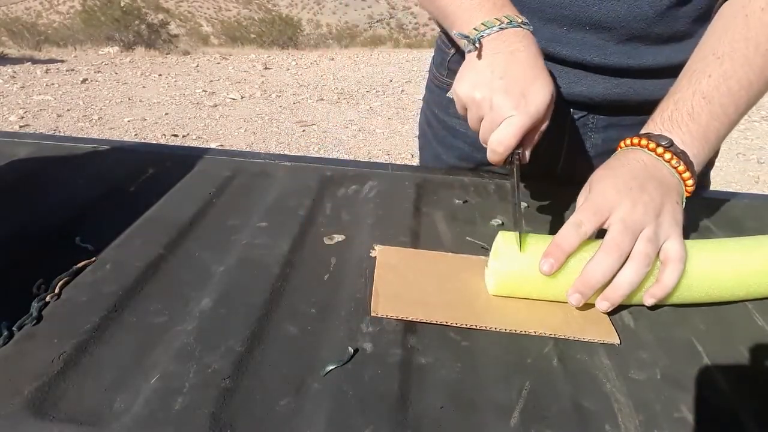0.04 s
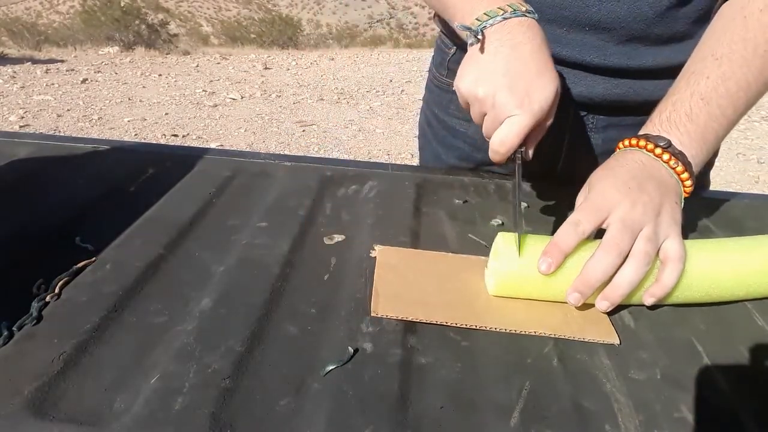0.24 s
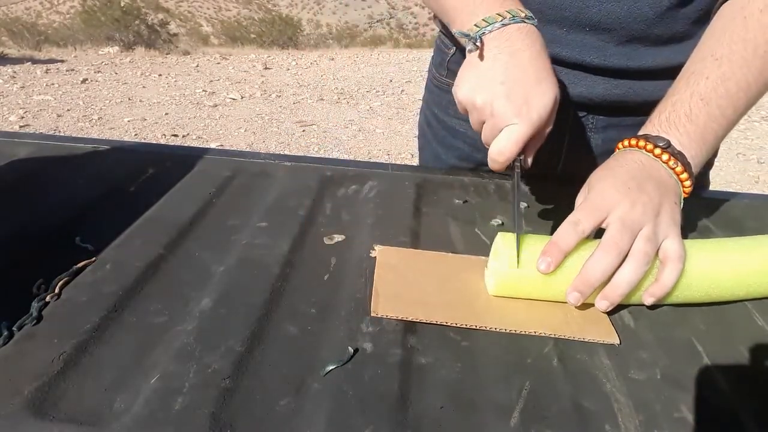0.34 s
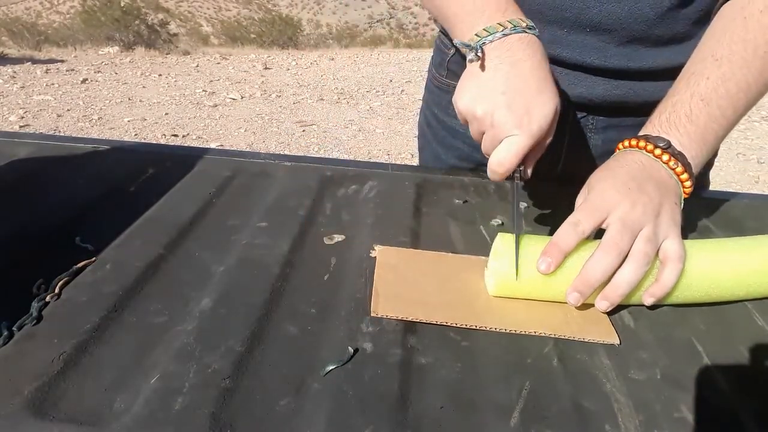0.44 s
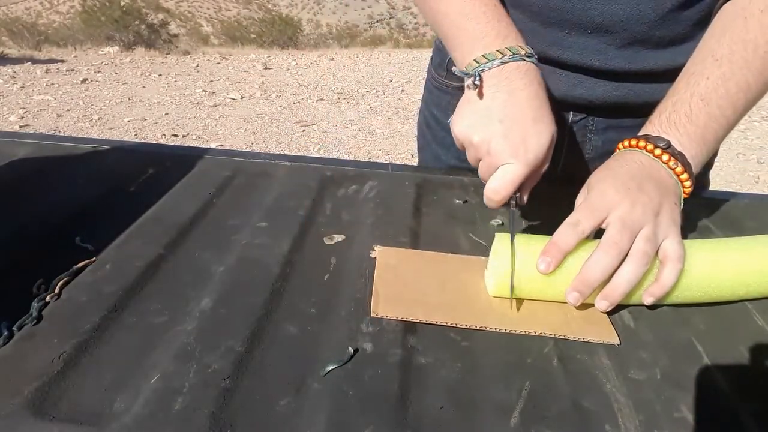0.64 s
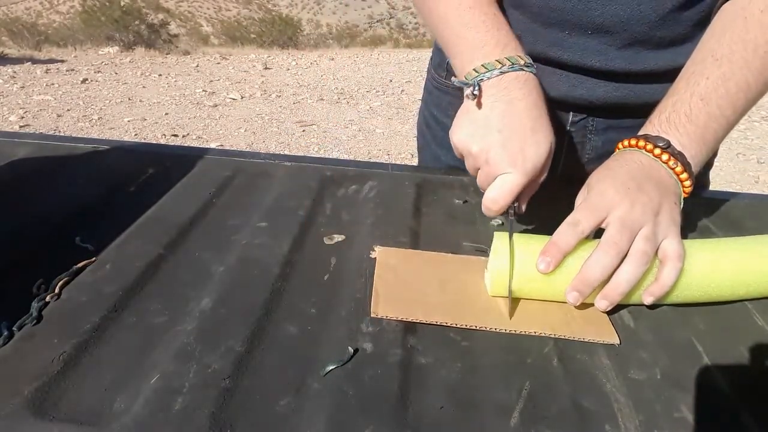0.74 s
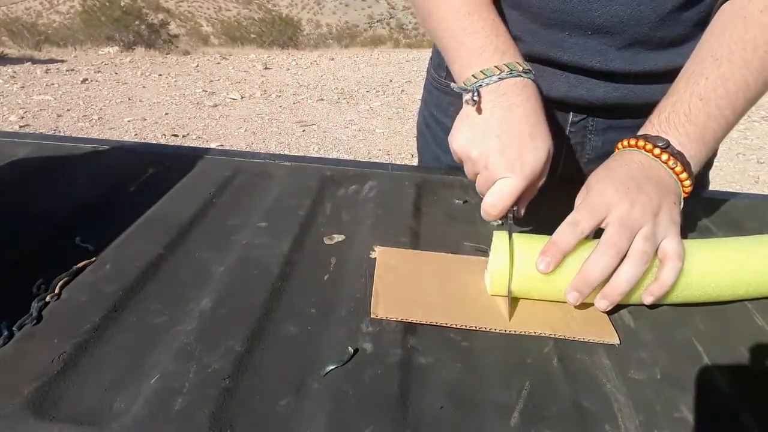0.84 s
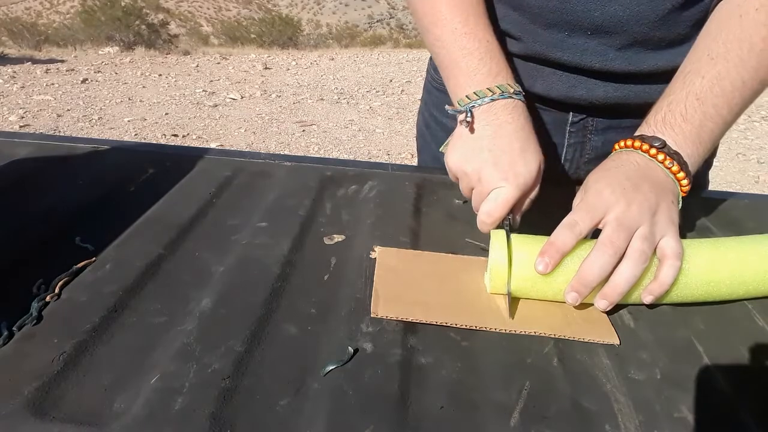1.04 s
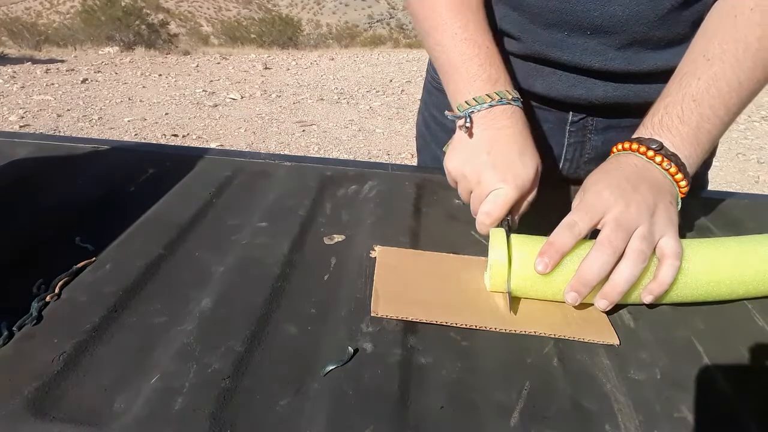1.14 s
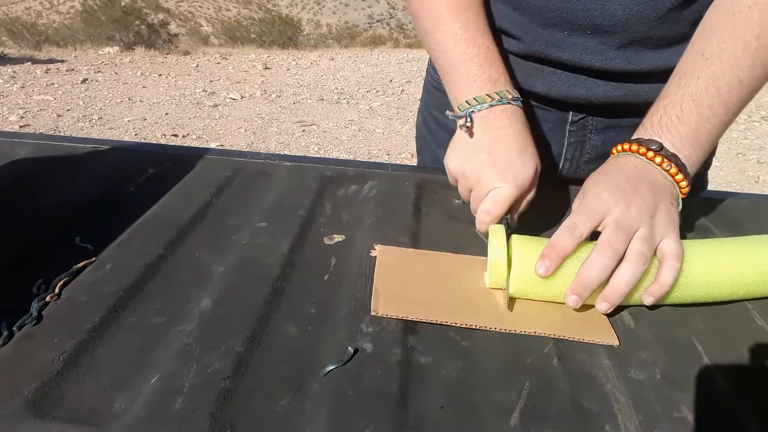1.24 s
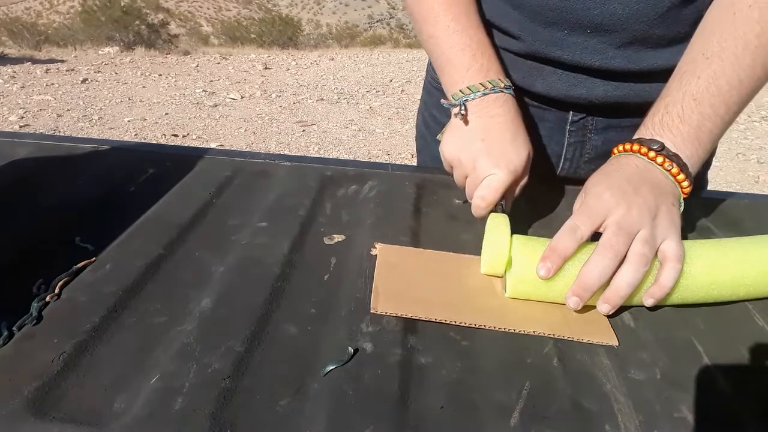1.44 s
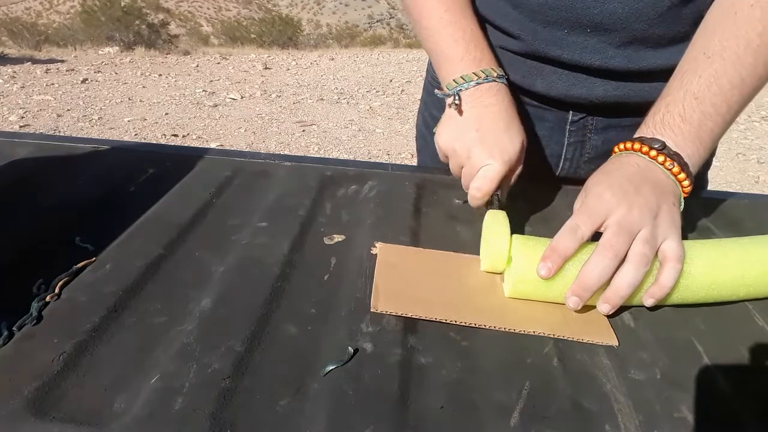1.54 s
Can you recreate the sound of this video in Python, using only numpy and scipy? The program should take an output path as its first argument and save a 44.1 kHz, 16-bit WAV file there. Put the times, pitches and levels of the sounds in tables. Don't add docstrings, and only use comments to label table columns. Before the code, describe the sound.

Foam being cut by a blade: crisp tearing rasps, a fading lull, then one last short stroke

```python
import sys
import numpy as np
from scipy import signal
from scipy.fft import rfft, irfft
from scipy.io import wavfile
from scipy.ndimage import uniform_filter1d

SR = 44100
rng = np.random.default_rng(int(sys.argv[2]) if len(sys.argv) > 2 else 0)


def output_pcm(signal):
    pcm = np.clip(np.atleast_2d(signal).T, -1, 1) * 32767
    wavfile.write(sys.argv[1], SR, np.round(pcm).astype(np.int16))


def invert_db(level):
    return 10 ** (np.asarray(level, dtype=float) / 20)


N = 70560


def rms_one(x):
    return x / np.sqrt(np.mean(x ** 2) + 1e-20)


def in_time(rows):
    time_s, *columns = np.transpose(rows)
    return [np.interp(np.arange(N) / SR, time_s, column) for column in columns]


def at_hz(points, hz):
    point_hz, point_db = np.transpose(points)
    return np.interp(np.log(hz), np.log(point_hz), point_db)


def drift(rate_hz):
    r = np.exp(-2 * np.pi * rate_hz / SR)
    wander = signal.lfilter([1], [1, -2 * r, r * r], rng.standard_normal(N + SR))
    return rms_one(wander[SR:])


def fade(x, decay_s):
    return signal.lfilter([1], [1, -np.exp(-1 / (decay_s * SR))], x + 1e-18)


def resonate(x, hz, width_hz):
    r = np.exp(-np.pi * width_hz / SR)
    zeros = (1 - r * r) / 2 * np.array([1, 0, -1])
    return signal.lfilter(zeros, [1, -2 * r * np.cos(2 * np.pi * hz / SR), r * r], x)


def highpass(x, cutoff_hz):
    return signal.sosfilt(signal.butter(4, cutoff_hz, "high", fs=SR, output="sos"), x)


def coloured(spectrum):
    hz = np.maximum(np.arange(N // 2 + 1) * SR / N, 1)
    return rms_one(irfft(rfft(rng.standard_normal((2, N))) * invert_db(at_hz(spectrum, hz)), N))


def ports(mid, side):
    return np.array([mid + side, mid - side])


def narrow(side):
    return signal.sosfilt(signal.ellip(8, 1, 60, 7500, fs=SR, output="sos"), side)


# freq_hz, density_db_per_hz
HUSH_SPECTRUM = [(240, -17), (410, -16), (598, -21.5), (2510, -26), (5430, -32), (15000, -24), (16000, -68)]


def hush():
    mid, side = coloured([(100, -61)] + list(HUSH_SPECTRUM))
    return invert_db(-77) * ports(mid, narrow(side))


# freq_hz, density_db_per_hz
WIND_SPECTRUM = [(20, -22), (50, -16), (85, -1), (105, -3), (135, -3), (200, -10), (400, -21), (800, -51.5)]
# time_s, level_db, left_minus_right_db
GUSTS = [(0, -60, 0), (.09, -69.5, 11), (.125, -50, 5), (.2, -58, 2.5), (.3, -49.5, -10.5),
         (.37, -57.5, 0.5), (.6, -58, -10.5), (.72, -50, 1.5), (.83, -65, -4), (.9, -43.5, -2),
         (.965, -41, -0.5), (1.03, -46, -9.5), (1.05, -37, 4), (1.07, -47, -2), (1.17, -52, 4),
         (1.4, -53.5, -2), (1.56, -59.5, -2.5), (1.59, -47, -6.5)]


def wind():
    LUMPY_DB, ALIKE, BRIGHTENS_DB_PER_DB = 4, 0.092, 0.84
    level_db, pan_db = in_time(GUSTS)
    a, b = coloured([(8, -66)] + list(WIND_SPECTRUM) + [(1500, -100)])
    lumps = invert_db(LUMPY_DB * np.array([drift(30), drift(25)]))
    pair = rms_one(lumps * ports(np.sqrt(1 + ALIKE) * a, np.sqrt(1 - ALIKE) * b))

    power = uniform_filter1d(pair ** 2, size=SR // 25)
    pair = pair / np.sqrt(uniform_filter1d(power, size=SR // 25))

    dull = signal.sosfiltfilt(signal.butter(2, 170, fs=SR, output="sos"), pair)
    pair = dull + (pair - dull) * invert_db(BRIGHTENS_DB_PER_DB * (level_db + 43.5))
    return invert_db(level_db + np.array([pan_db, -pan_db]) / 2) * pair


# time_s, level_db
SLIDE_LEVEL = [
    (1.335, -59),
    (1.37, -57.5),
    (1.48, -60),
    (1.53, -64.5),
    (1.6, -67),
]
# freq_hz, width_hz, level_db
SLIDE_BANDS = [(1220, 660, -1), (2500, 1270, -3.5), (4500, 1500, -4), (7630, 1550, -6.5),
               (10560, 1700, -7.5), (14000, 3300, -9)]


def slide():
    level_db, = in_time([(0, -130), (SLIDE_LEVEL[0][0] - .02, -90)] + list(SLIDE_LEVEL))
    friction = rng.standard_normal((2, N))
    rubbed = np.zeros((2, N))
    for k, (hz, width_hz, band_db) in enumerate(SLIDE_BANDS):
        rubbed += (-1) ** k * invert_db(band_db + drift(6.7)) * resonate(friction, hz, width_hz)
    mid, side = rms_one(rubbed)
    return invert_db(level_db) * ports(mid, invert_db(-4.5) * narrow(side))


# freq_hz, side_minus_mid_db
PORT_DIFFERENCE = [(300, -9), (1000, -15), (2000, -14), (4000, -3), (8000, -6), (14000, -6.5)]


def side_gain(hz):
    return invert_db(at_hz(PORT_DIFFERENCE, hz))


def cracks(time_s, peak_db, pitch_hz):
    CRACK_DB, CYCLES, LEAST_S = -5, .5, .00007
    steps = np.arange(SR // 200)
    t, hz = steps / SR, pitch_hz[:, None]
    age = t / np.maximum(CYCLES / hz, LEAST_S)
    pulse = np.sin(2 * np.pi * hz * t) * age * np.exp(1 - age)
    index = (time_s * SR).astype(int)[:, None] + steps - 8
    out = np.zeros((2, N))
    for row, gain in zip(out, [1, side_gain(pitch_hz)]):
        size = gain * invert_db(peak_db + CRACK_DB) * rng.choice([-1, 1], len(time_s))
        np.add.at(row, index, size[:, None] * pulse)
    return highpass(out + 1e-18, 1050)


# time_s, peak_db, pitch_hz (favoured region)
FIRST_TEARS = [(0.2343, -39, 2080), (0.2391, -29, 1890), (0.2442, -18, 1890), (0.2539, -20, 1890),
               (0.26, -26, 1890), (0.2656, -27, 2080), (0.2773, -25, 1290), (0.2934, -31, 1170),
               (0.3011, -24, 1560), (0.3033, -28, 1890), (0.3098, -26, 1890), (0.3151, -28, 1560),
               (0.3172, -24, 1420), (0.3308, -30, 2080), (0.3369, -33, 1170), (0.3561, -31, 1560),
               (0.3585, -27, 1720), (0.3643, -28, 1890), (0.3697, -26, 2080), (0.3747, -26, 2280),
               (0.3832, -29, 2080), (0.3886, -27, 2280), (0.3959, -29, 1170), (0.3989, -27, 2080),
               (0.4021, -28, 2280), (0.4071, -30, 2770), (0.4106, -29, 1890), (0.4187, -30, 2080),
               (0.4278, -32, 1890), (0.4392, -31, 1290), (0.4464, -26, 2080), (0.4499, -31, 2280),
               (0.4582, -25, 1890), (0.4713, -27, 2280)]
DEEP_TEARS = [(0.4802, -26, 1890), (0.4861, -22, 1290), (0.4949, -26, 1890), (0.4994, -26, 1290),
              (0.5088, -30, 1290), (0.5159, -22, 3350), (0.5241, -26, 1290), (0.5275, -26, 1560),
              (0.5315, -22, 3350), (0.5351, -18, 1420), (0.5463, -21, 6530), (0.5519, -29, 1420),
              (0.5557, -31, 1890), (0.5641, -29, 1890), (0.5668, -21, 12730), (0.5739, -28, 3350),
              (0.5814, -21, 3350), (0.59, -21, 3040), (0.6006, -24, 1290), (0.6053, -22, 1890),
              (0.6098, -21, 3350), (0.6149, -20, 2770), (0.6227, -24, 3350), (0.6319, -23, 1560),
              (0.6393, -17, 3350), (0.6429, -26, 1560), (0.6536, -13, 3040), (0.6649, -25, 1720),
              (0.6716, -20, 1890), (0.6749, -24, 1560), (0.683, -18, 3040), (0.6868, -24, 3040),
              (0.692, -27, 7180), (0.6948, -25, 3350), (0.6977, -24, 3040), (0.703, -31, 3350)]
SLOW_TEARS = [(0.7101, -21, 3040), (0.7191, -25, 3350), (0.7271, -24, 3040), (0.7351, -21, 3350),
              (0.7466, -21, 2770), (0.757, -34, 12730), (0.7595, -30, 9560), (0.7641, -35, 2770),
              (0.7744, -30, 11570), (0.7816, -29, 14000), (0.7918, -34, 7900), (0.7953, -44, 2280),
              (0.7997, -37, 6530), (0.8083, -49, 7900), (0.8204, -33, 7180), (0.8305, -39, 10520),
              (0.8341, -36, 3350), (0.8419, -31, 3350), (0.8574, -32, 2080), (0.8732, -38, 14000),
              (0.8757, -38, 1720), (0.8811, -37, 7900), (0.8892, -36, 12730), (0.9063, -37, 1560),
              (0.9224, -31, 14000), (0.9282, -34, 2080), (0.9368, -39, 1420), (0.9536, -29, 2080),
              (0.9616, -41, 14000), (0.9688, -39, 2510), (0.9798, -29, 1720), (0.9846, -42, 7180),
              (1.0047, -35, 14000), (1.0148, -37, 3040), (1.0224, -45, 2770), (1.0336, -49, 12730)]
LAST_TEARS = [(1.1212, -51, 7180), (1.1273, -47, 1720), (1.1298, -37, 3040), (1.1347, -41, 3040),
              (1.1392, -39, 1560), (1.1451, -47, 3040), (1.1498, -36, 1720), (1.1534, -32, 12730),
              (1.1658, -29, 1560), (1.1714, -28, 1720), (1.1786, -30, 1720), (1.1866, -29, 1560),
              (1.1928, -24, 1560), (1.199, -19, 2770), (1.2044, -22, 3350), (1.2114, -18, 1720),
              (1.2279, -26, 1720), (1.2304, -30, 1560), (1.2349, -27, 1890), (1.2406, -30, 3680),
              (1.2475, -27, 1890), (1.2566, -20, 1720), (1.2603, -23, 1560), (1.264, -34, 11570),
              (1.271, -28, 12730), (1.2831, -31, 1720), (1.2884, -31, 1890), (1.2919, -31, 1420),
              (1.295, -41, 1720), (1.2999, -40, 1420), (1.3067, -21, 1720), (1.3112, -31, 1890),
              (1.3152, -25, 3350), (1.3178, -21, 1890), (1.3223, -30, 1890), (1.3274, -28, 1890),
              (1.3319, -40, 1890), (1.3366, -43, 1720)]
DOUBLE_TEARS = [
    (0.2995, -21, 11000),
    (0.682, -17, 9000),
    (0.9816, -29, 4000),
]


def large_tears():
    tables = (FIRST_TEARS, DEEP_TEARS, SLOW_TEARS, LAST_TEARS, DOUBLE_TEARS)
    return np.transpose([row for table in tables for row in table])


# time_s, level_db, tilt_db_per_octave, card_coupling_db
STROKES = [
    [(.232, -42, -2, 10), (.241, -38.5, 1, 12), (.32, -37.5, 0.5, 11.5), (.345, -39.5, 0.5, 10.5),
     (.37, -40.5, 1.5, 9), (.44, -39.5, 1.5, 12.5), (.48, -35, 1.5, 11), (.615, -32.5, 1, 7),
     (.685, -31.5, 2, 3)],
    [(.7, -36.5, 1, 1), (.74, -38.5, 1.5, 1), (.79, -49, 3, 3.5), (.815, -58.5, 3, -2), (.88, -46.5, 2, -4),
     (.94, -52.5, 1.5, -8), (.965, -51.5, 3.5, -11), (1.02, -57.5, 1.5, -9), (1.07, -72, 4.5, -12)],
    [(1.11, -66, 1, 3), (1.15, -49, 4, 0), (1.19, -35.5, 0, -14), (1.205, -31.5, 2.5, 5),
     (1.24, -35, 0, -2), (1.3, -54, 3.5, 10.5), (1.316, -38, 2, 11), (1.335, -51, -3, -17)],
]


def stroke_curves():
    before = [(0, -120, -6, -1), (STROKES[0][0][0] - .004, -90, 0, 0)]
    after = [(STROKES[-1][-1][0] + .06, -100, 0, 0)]
    return in_time(before + [row for stroke in STROKES for row in stroke] + after)


# freq_hz, width_hz, level_db
BODY = [(325, 127, -4.5), (500, 504, -1.5), (855, 144, -3), (1115, 157, -3.5), (1275, 166, 1),
        (1810, 94, 6.5), (2370, 520, -3), (3317, 307, 0), (4350, 2170, -10), (7670, 1870, -7.5),
        (8990, 2900, -12), (14030, 4800, -7.5), (15040, 4400, -12.5)]


def knife():
    SMALL_PER_S, SMALL_DB, SMALL_SPREAD_DB = 500, -7, 2.0
    TEAR_DB, SNAP_DB, COLOUR_DB, GRIT_DB = -7.5, 16, 1.5, 4.5
    FOCUS_DB, FOCUS_OCTAVES = 5, 0.35
    BURST_S, RISE_S = .0008, .0001
    RASP_DB, RASP_PATCHY_DB = -5.5, 3
    CARD_ABOVE_HZ, CARD_BELOW_HZ = 650, 1200
    level_db, tilt_db, card_db = stroke_curves()
    time_s, peak_db, pitch_hz = large_tears()

    small = np.flatnonzero(rng.random(N) < SMALL_PER_S / SR)
    excess = np.minimum(rng.exponential(1, N), 3)[small]
    small_db = level_db[small] + SMALL_DB + SMALL_SPREAD_DB * excess
    at = np.r_[small, (time_s * SR).astype(int)]
    luck = rng.standard_normal((N, len(BODY)))[np.r_[small, np.arange(len(time_s))]]

    grit = rng.standard_normal((2, N))
    grit = rms_one(grit * invert_db(GRIT_DB * rng.standard_normal(N)))
    fine = rng.standard_normal((2, N))
    together = drift(77)

    out = cracks(time_s, peak_db, pitch_hz)
    signs = np.array([np.ones(N), np.sign(drift(270))])
    for k, (hz, width_hz, body_db) in enumerate(BODY):
        octaves = np.log2(hz / pitch_hz)
        focus_db = FOCUS_DB * (np.exp(-(octaves / FOCUS_OCTAVES) ** 2) - .5)
        clicks = np.zeros(N)
        tear_db = np.r_[small_db, peak_db + TEAR_DB + focus_db]
        np.add.at(clicks, at, invert_db(tear_db + COLOUR_DB * luck[:, k]))
        bursts = fade(clicks, BURST_S) - fade(clicks, RISE_S)
        rasp = invert_db(level_db + RASP_DB + RASP_PATCHY_DB * (together + 0.91 * drift(76)))

        on_card = CARD_ABOVE_HZ < hz < CARD_BELOW_HZ
        gain = invert_db(body_db + 4.5 + tilt_db * np.log2(hz / 2000) + card_db * on_card)
        drive = invert_db(SNAP_DB) * clicks * signs + bursts * grit + rasp * fine
        rung = resonate(gain * drive, hz, width_hz)
        if hz > CARD_BELOW_HZ:
            rung = highpass(rung, CARD_BELOW_HZ)
        out = out + (-1) ** k * rung * np.array([[1], [side_gain(hz)]])

    lead = .45 * np.gradient(signal.lfilter([.4], [1, -.6], out[0]))
    return ports(out[0], out[1] + lead)


def scene():
    return knife() + slide() + wind() + hush()


def roll_off(x):
    return signal.sosfilt(signal.butter(12, 16540, fs=SR, output="sos"), x)


def record(dry):
    mix = signal.sosfilt(signal.ellip(12, .5, 70, 15750, fs=SR, output="sos"), dry)
    return roll_off(mix)


dry = scene()
out = record(dry)
output_pcm(out)
```